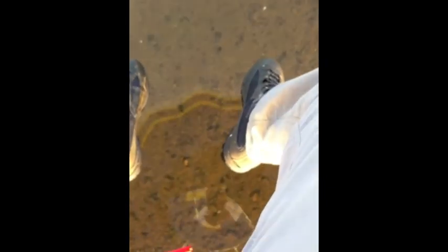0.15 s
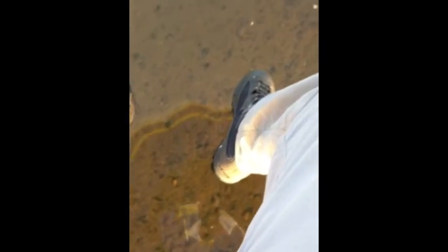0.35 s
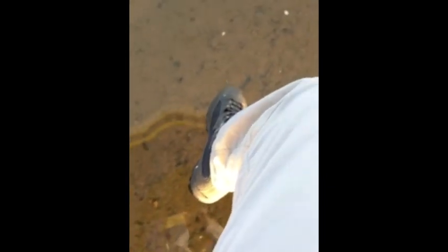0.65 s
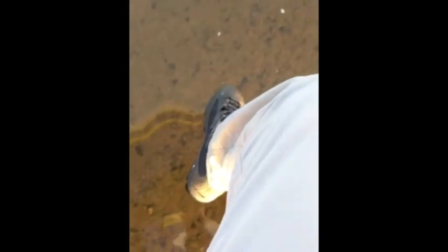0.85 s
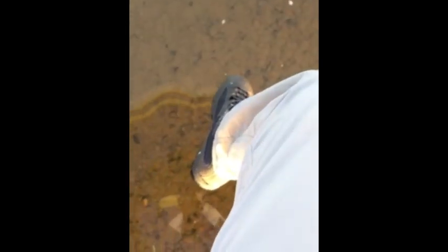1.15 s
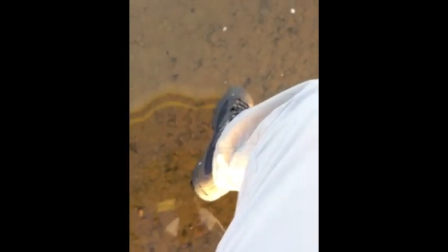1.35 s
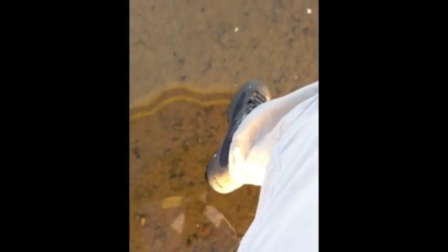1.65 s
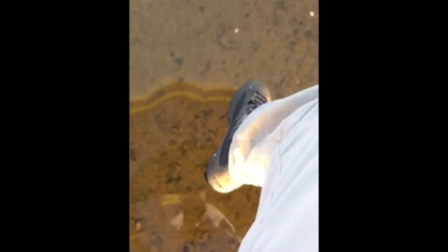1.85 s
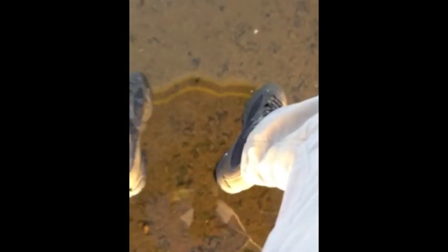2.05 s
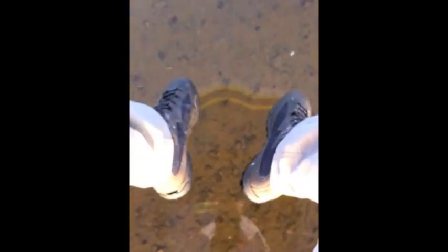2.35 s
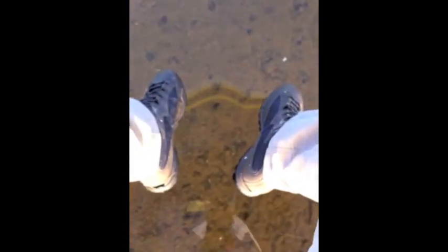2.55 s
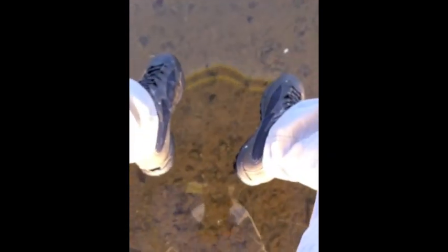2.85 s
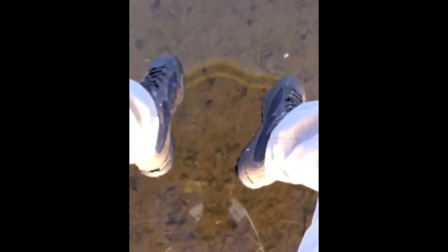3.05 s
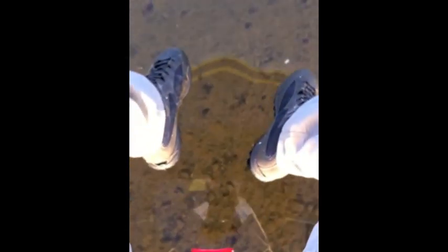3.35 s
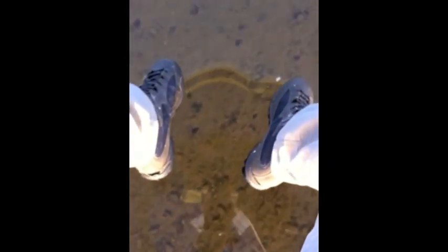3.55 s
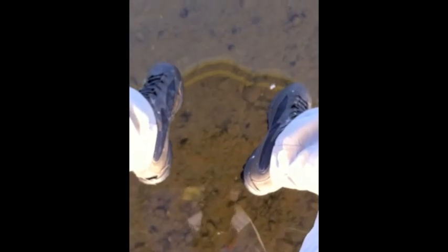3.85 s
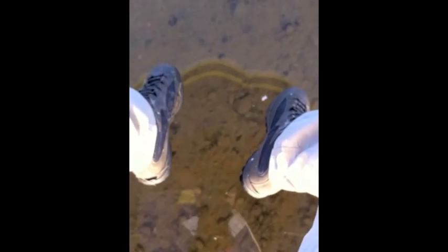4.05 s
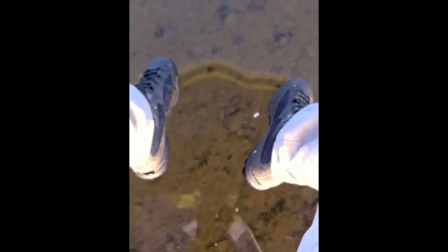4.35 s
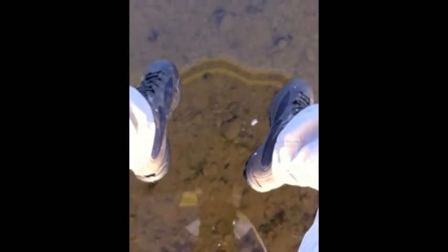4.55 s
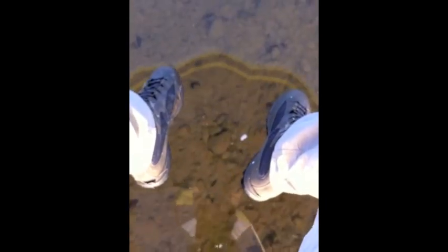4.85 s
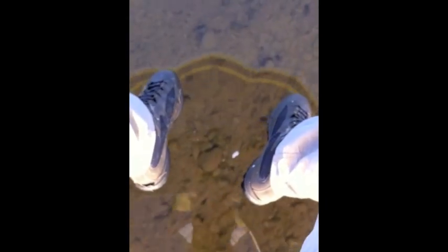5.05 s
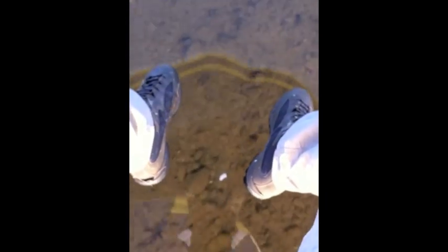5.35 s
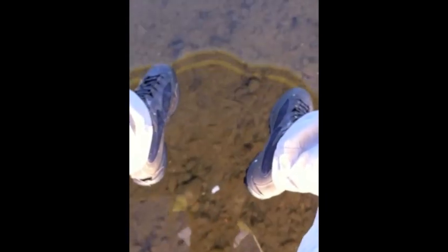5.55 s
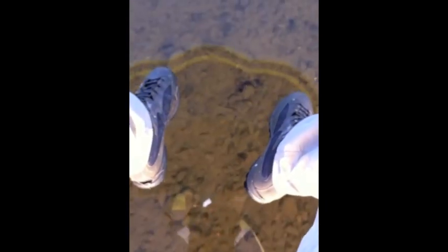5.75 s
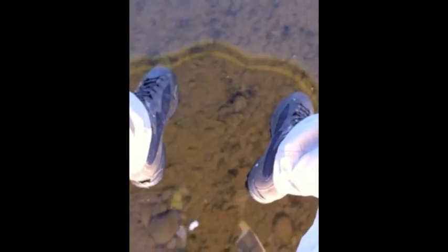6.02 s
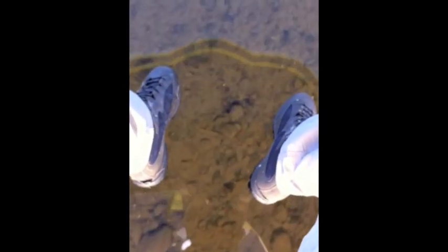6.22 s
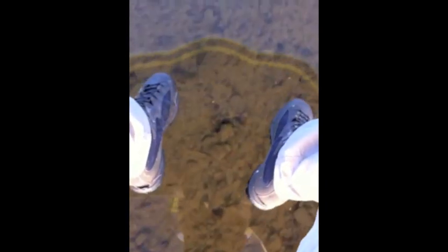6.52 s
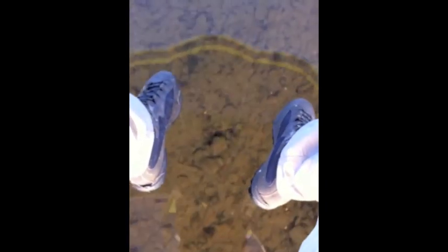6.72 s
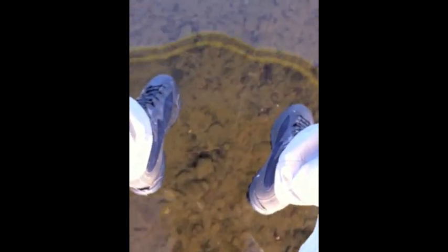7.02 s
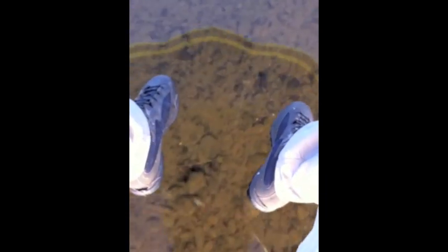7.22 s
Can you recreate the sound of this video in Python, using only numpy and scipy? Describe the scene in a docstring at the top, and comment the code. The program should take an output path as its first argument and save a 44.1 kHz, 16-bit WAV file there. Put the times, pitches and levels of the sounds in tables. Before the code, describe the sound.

A burner flame fires above the microphone in open air, close and dry, with no echo. Blasts of half a second or so come one after another: bright gas hiss, midrange roar and low rumble together, weakening before each shut-off. Dull whumps puff inside the flame. In two later pauses a small hollow flame keeps ringing in the burner can. Then longer, heavier burns, surging and sagging, squeezed at their loudest, run until the end.

```python
"""In open air, close below the propane burner of a small hot-air balloon: one blast dies away, five more fire,
then come two longer burns, the last running to the end.
The gas jet hisses, swelling and sagging in each blast; the flame follows with a rumble and a roar.
Pockets of gas light with a low whump. A small, hollow-sounding flame burns on in two of the pauses,
over a faint steady rush; a limiter holds down the loudest surges."""
import sys
import numpy as np
from scipy import signal
from scipy.fft import rfft, irfft
from scipy.io import wavfile
from scipy.ndimage import uniform_filter1d, minimum_filter1d

SR = 44100
rng = np.random.default_rng(int(sys.argv[2]) if len(sys.argv) > 2 else 0)


def store_wav(level_fs):
    """Save 16-bit WAV to argv[1]."""
    pcm = np.round(np.clip(np.atleast_2d(level_fs), -1, 1) * 32767)
    wavfile.write(sys.argv[1], SR, pcm.T.astype(np.int16))


N = 325458

# Short blasts of gas, the first already dying away; flares() plays the last column:
# valve opens t/s, valve shuts t/s, jet strength level/dB, time to fill the line t/s,
# sag until it shuts level/dB, lift of roar and rush level/dB
SHORT_BLASTS = [(-0.7, -0.112, -24, .05, 20.5, 0), (.104, .69, -24.2, .04, 20.3, -.4),
                (.878, 1.446, -22, .041, 20.3, -1.4), (1.644, 2.228, -22.2, .063, 22.7, 0),
                (2.603, 3.21, -23.7, .041, 23.8, .4), (3.442, 4.143, -26.4, .037, 15.7, .7)]
# Long burns: valve opens t/s, valve shuts t/s
LONG_BURNS = [(4.627, 5.71), (6.003, 7.5)]
# The hand on the valve, one list for each long burn: t/s, jet strength level/dB
HAND_ON_VALVE = [
    [(4.66, -40), (4.726, -34), (5.142, -30), (5.278, -33), (5.394, -32), (5.412, -37), (5.456, -35),
     (5.7, -45)],
    [(6.01, -43), (6.07, -32), (6.278, -30), (6.612, -35), (6.74, -41), (6.888, -27), (7.328, -35),
     (7.37, -31)],
]
EMPTY_LINE_DB = 22  # a blast starts this far under its strength
SAG_POWER = 1.8  # above 1: the sag speeds up


def jet_strength(t):
    """Strength of the gas jet in dB: a short blast fills the line and sags, a long burn follows the hand."""
    firings = []
    for opens, shuts, strength_db, fill_s, sag_db, _ in SHORT_BLASTS:
        age = np.clip(t - opens, 0, shuts - opens)
        filling_db = -EMPTY_LINE_DB * np.exp(-age / fill_s)
        sagging_db = -sag_db * (age / (shuts - opens)) ** SAG_POWER
        firings.append(strength_db + filling_db + sagging_db + valve(t, opens, shuts))
    for (opens, shuts), hand in zip(LONG_BURNS, HAND_ON_VALVE):
        hand_t, hand_db = np.transpose(hand)
        firings.append(np.interp(t, hand_t, hand_db) + valve(t, opens, shuts))
    return np.max(firings, axis=0)


OPEN_DB_PER_S, SHUT_DB_PER_S = 1150, 175


def valve(t, opens, shuts):
    """Gain in dB of a valve that snaps open, holds at 0 dB and is eased shut."""
    return -OPEN_DB_PER_S * np.maximum(opens - t, 0) - SHUT_DB_PER_S * np.maximum(t - shuts, 0)


FULL_JET_DB = -25
STARVE_JET_DB, STARVE_SOFT_DB = -53.4, 3.3  # the flame runs short of gas below this strength; softness of the bend


def follow(jet_db, full_db, slope, starved_slope):
    """Gain of one part: full_db at full jet, rising in dB per dB of jet, falling further once starved."""
    starved_db = STARVE_SOFT_DB * np.logaddexp(0, (STARVE_JET_DB - jet_db) / STARVE_SOFT_DB)
    return gain_of(full_db + slope * (jet_db - FULL_JET_DB) - starved_slope * starved_db)


# Colour of the flame's low rumble: f/Hz, level/dB (per Hz)
RUMBLE_COLOUR = [(15, -48), (30, -45), (48, -40), (65, -35), (90, -20.5), (120, -11), (160, -1), (200, 1),
                 (260, 0.5), (320, -3.5), (390, -10.5), (520, -24), (1000, -60), (2000, -100)]


def rumble(t, billow):
    """The flame's low end, answering the jet 9 ms late."""
    gain = follow(jet_strength(t - .009), full_db=-14.5, slope=.16, starved_slope=1.65)
    return gain * flame(RUMBLE_COLOUR, billow, billow_db=1.2, flutter_db=1.5)


# Colour of the full flame's roar: f/Hz, level/dB (per Hz)
ROAR_COLOUR = [(40, -49), (200, -26), (320, -4.5), (410, -1), (530, 0), (630, 0), (800, -5), (980, -6),
               (1170, -13.5), (1400, -18), (1750, -30), (3000, -60), (6000, -100)]


def roar(t, billow):
    """The flame's midrange, answering the jet 4 ms late."""
    gain = follow(jet_strength(t - .004), full_db=-17.9, slope=.26, starved_slope=1.45)
    return gain * flame(ROAR_COLOUR, billow, billow_db=0.5, flutter_db=0.92)


def flame(spectrum, billow, billow_db, flutter_db):
    """Pockets of gas burn in quick uneven bursts, which together make the flame's noise."""
    bursts = gain_of(billow_db * billow + flutter_db * eddies(130)) * rng.standard_normal(N)
    return evened(coloured(bursts, spectrum))


FLARE_DB, FLARE_S, FLARE_WIDTH_S = 1.8, .13, .06  # lift, delay after the valve opens, spread


def flares(t):
    """Gain of the roar and rush: each short blast has its own vigour, and flares as the line fills."""
    lift_db = np.zeros(N)
    for opens, shuts, *_, vigour_db in SHORT_BLASTS:
        lift_db += vigour_db * gain_of(valve(t, opens, shuts))
        lift_db += FLARE_DB * np.exp(-((t - opens - FLARE_S) / FLARE_WIDTH_S) ** 2)
    return gain_of(lift_db)


# Colour of the jet's rush: f/Hz, level/dB (per Hz)
RUSH_COLOUR = [(300, -32), (700, -5), (1300, 2.5), (1500, 2.5), (1750, -2), (2200, 1), (2550, -4),
               (2950, -3), (3400, -6), (4400, -6.5), (5400, -9.5), (6600, -9.5), (8000, -13), (16000, -20)]


def rush(t, billow):
    """The broad midrange and treble of the gas stream, in step with the jet."""
    gain = follow(jet_strength(t), full_db=-28.7, slope=.42, starved_slope=.95)
    return gain * jet(RUSH_COLOUR, billow, billow_db=0.35, flutter_db=0.27)


# Colour of the jet's hiss: f/Hz, level/dB (per Hz)
HISS_COLOUR = [(3000, -40), (7000, -12.5), (8500, -9.5), (10000, -5.5), (11500, -2.5), (12800, -0.5),
               (14000, -2), (15500, -7)]


def hiss(t, billow):
    """The top of the gas stream, which tracks the jet almost dB for dB."""
    gain = follow(jet_strength(t), full_db=-23.6, slope=1.02, starved_slope=.15)
    return gain * jet(HISS_COLOUR, billow, billow_db=0.13, flutter_db=0.15)


def jet(spectrum, billow, billow_db, flutter_db):
    """Shear noise of the gas stream, shaken by its eddies."""
    return evened(noise(spectrum) * gain_of(billow_db * billow + flutter_db * eddies(200)))


# Gas lighting all at once, as a blast starts or in mid-burn; lulls() plays the last column:
# t/s, swing level/dB, pitch of the puff f/Hz, scale of the deep push level/dB, lull after it level/dB
GAS_WHUMPS = [(.121, -21, 130, -26, 3), (.368, -15, 132, -19, 1), (.888, -20, 170, -32, 2),
              (1.657, -28, 170, -40, 3), (1.866, -11, 200, -33, 1), (2.612, -20, 152, -31, 1),
              (2.87, -8.5, 215, -33, 2.5), (3.102, -8.5, 215, -35, 1), (3.459, -12, 191, -27, 3),
              (3.558, -13, 140, -21, 0), (4.04, -11, 210, -33, 0), (4.637, -8, 192, -7.5, 5.5),
              (4.779, -9, 210, -30, 2), (6.028, -19, 121, -25, 1), (6.693, -8.5, 210, -30, 1)]


def whumps(t, length_s=0.0056, push_s=0.0024):
    """Gas that has gathered lights at once: a few low swings of pressure on one broad push and pull."""
    out = np.zeros(N)
    for start, swing_db, pitch_hz, push_db, _ in GAS_WHUMPS:
        age = t - start
        cycles = pitch_hz * age + rng.random()
        swing = np.exp(-(age / length_s) ** 2 / 2) * np.sin(2 * np.pi * cycles)
        u = age / push_s
        push = -u * np.exp(-u ** 2)
        out += gain_of(swing_db) * swing + gain_of(push_db) * push
    return out


LULL_S = .035  # the dip is deepest this long after a whump
FLASH_SHARE, FLASH_S = .55, .009  # the flame jumps with the whump, by this share of the lull


def lulls(t):
    """Gain of the flame: it jumps with a whump, which uses up the gas around it, and takes a moment to refill."""
    change_db = np.zeros(N)
    for start, *_, lull_db in GAS_WHUMPS:
        flash = FLASH_SHARE * np.exp(-((t - start) / FLASH_S) ** 2)
        u = np.maximum(t - start, 0) / LULL_S
        dip = (u * np.exp(1 - u)) ** 2
        change_db += lull_db * (flash - dip)
    return gain_of(change_db)


# The small flame's broad colour: f/Hz, level/dB (per Hz)
SMALL_FLAME_COLOUR = [(30, -33), (55, -27), (125, -9), (200, -0.5), (380, -13), (600, -10), (850, -7.5),
                      (1050, -12), (1250, -22), (3000, -22), (3800, -25), (7000, -25.5), (12300, -28.5),
                      (15500, -41)]
# Resonances of the burner can that stand out at low flame: f/Hz, width f/Hz, lift level/dB
CAN_RESONANCES = [(215, 35, 6.5), (305, 40, 15), (440, 40, 13), (730, 45, 5), (950, 60, 3), (1090, 50, 6),
                  (1540, 100, 8), (1690, 90, 6), (2430, 140, 4), (3100, 150, 4)]


def small_flame():
    """A quiet, even flame that rings the burner can."""
    hz = np.fft.rfftfreq(N, 1 / SR)
    lift_db = sum(db / (1 + (2 * (hz - centre) / width) ** 2) for centre, width, db in CAN_RESONANCES)
    return evened(irfft(rfft(noise(SMALL_FLAME_COLOUR)) * gain_of(lift_db), N))


# Pauses with a small flame alight, the valve not fully shut: from t/s, to t/s, level/dB
LIT_PAUSES = [(4.22, 4.62, -40.7), (5.79, 6.0, -42)]


def low_flame(t, fade_s=0.034):
    """Gain of the small flame, faded in and out around each lit pause."""
    gain = np.zeros(N)
    for start, end, db in LIT_PAUSES:
        inside_s = np.minimum(t - start, end - t)
        gain += gain_of(db) * np.sqrt(np.clip(inside_s / fade_s + .5, 0, 1))
    return gain


# Colour of the faint steady rush, likely the pilot light: f/Hz, level/dB (per Hz)
PILOT_COLOUR = [(18, -69), (30, -39), (197, 0), (299, -8), (639, -12), (691, -18), (945, -16), (1400, -30),
                (1910, -28), (2550, -33), (15500, -41)]


def pilot():
    """Steady filtered noise at -55 dB, always there and heard in the pauses."""
    return gain_of(-55) * noise(PILOT_COLOUR)


def gain_of(db):
    """Decibels to gain."""
    return 10 ** (np.asarray(db) / 20)


def evened(x):
    """Scales to rms 1."""
    return x / np.sqrt(np.mean(x ** 2) + 1e-20)


def coloured(x, points):
    """Filters by a spectrum of (f/Hz, level/dB) points, joined along log frequency."""
    point_hz, point_db = np.transpose(points)
    hz = np.fft.rfftfreq(N, 1 / SR)
    db = np.interp(np.log(hz + 1), np.log(point_hz), point_db)
    return irfft(rfft(x) * gain_of(db), N)


def noise(points):
    """Noise of rms 1 with the given spectrum."""
    return evened(coloured(rng.standard_normal(N), points))


def eddies(rate_hz):
    """Random wander of rms 1, up to about the given rate."""
    hz = np.fft.rfftfreq(N, 1 / SR)
    return evened(irfft(rfft(rng.standard_normal(N)) / np.sqrt(1 + (hz / rate_hz) ** 4), N))


def scene():
    """One gas jet drives all parts of one billowing flame, in open air; both channels hear the same."""
    t = np.arange(N) / SR
    billow = eddies(32)
    lull, flare = lulls(t), flares(t)
    burning = lull * (rumble(t, billow) + flare * roar(t, billow))
    # the rush takes half the lull in dB, the hiss none
    gas = np.sqrt(lull) * flare * rush(t, billow) + hiss(t, billow)
    pauses = low_flame(t) * small_flame() + pilot()
    sound = burning + gas + whumps(t) + pauses
    return np.array([sound, sound])


EDGE_HZ = 15750


def record(dry, ceiling_db=-3.5, recovery_db_per_s=70):
    """A look-ahead limiter ducks at each peak and recovers at a steady rate; then a steep low-pass."""
    over_db = np.maximum(20 * np.log10(abs(dry).max(0) + 1e-9) - ceiling_db, 0)
    # hold each peak over a 2 ms window, so the duck starts ahead of it
    over_db = -minimum_filter1d(-over_db, size=89)
    fall_db = np.arange(N) / SR * recovery_db_per_s
    recovering_db = np.maximum.accumulate(over_db + fall_db) - fall_db
    duck_db = uniform_filter1d(recovering_db, size=89)
    low_pass = signal.firwin(767, EDGE_HZ, window=("kaiser", 9), fs=SR)
    return signal.oaconvolve(dry / gain_of(duck_db), low_pass[None], "same")


dry = scene()
out = record(dry)
store_wav(out)
```